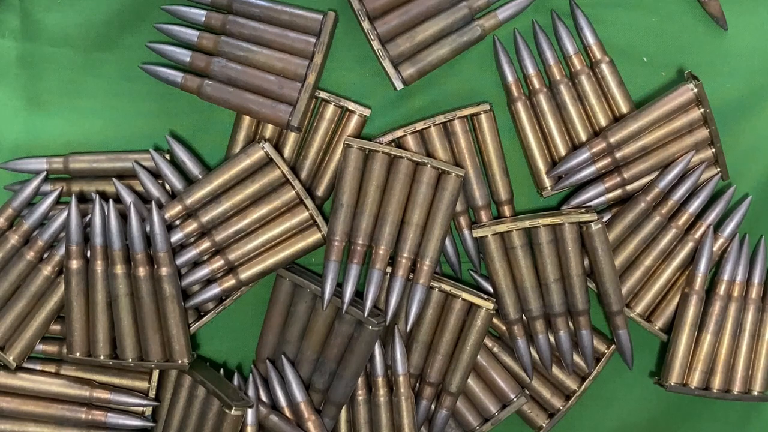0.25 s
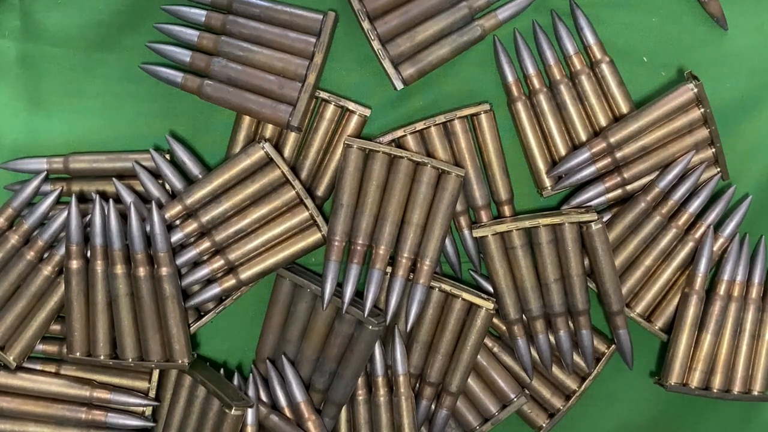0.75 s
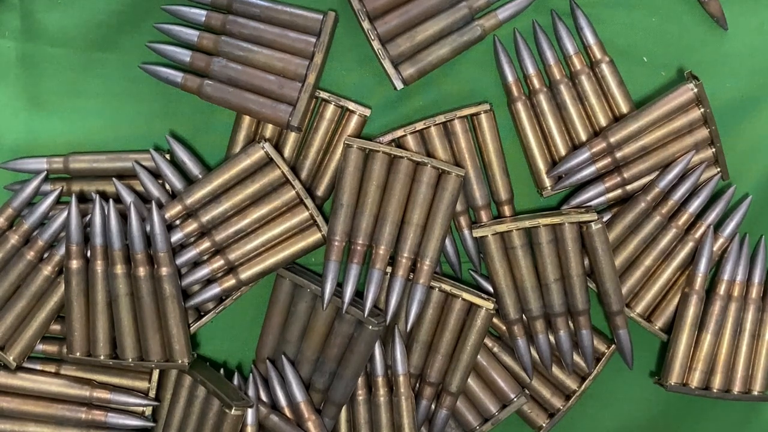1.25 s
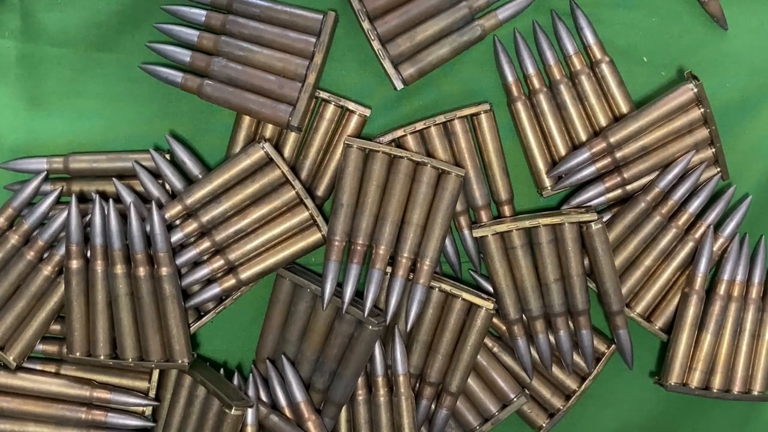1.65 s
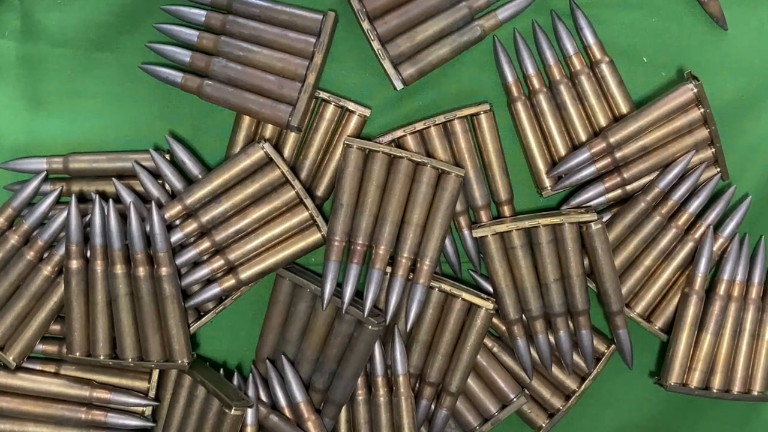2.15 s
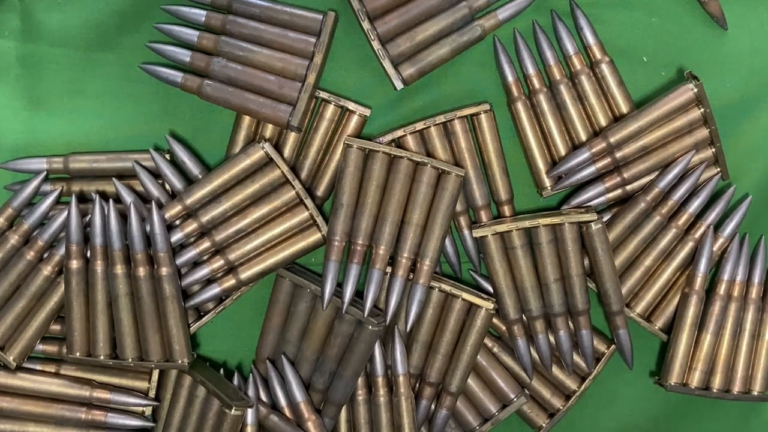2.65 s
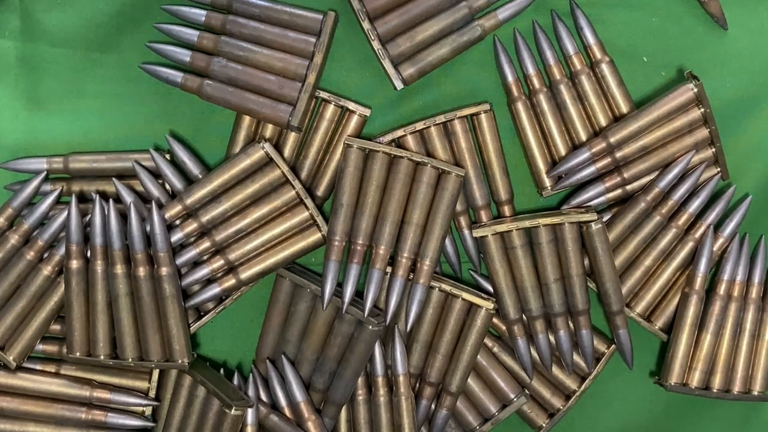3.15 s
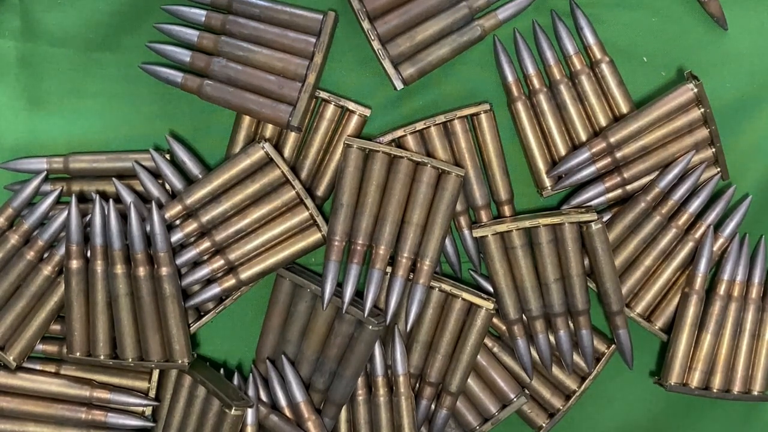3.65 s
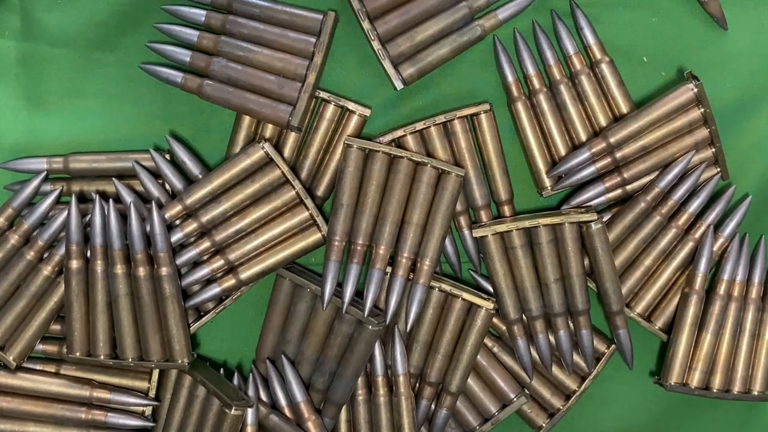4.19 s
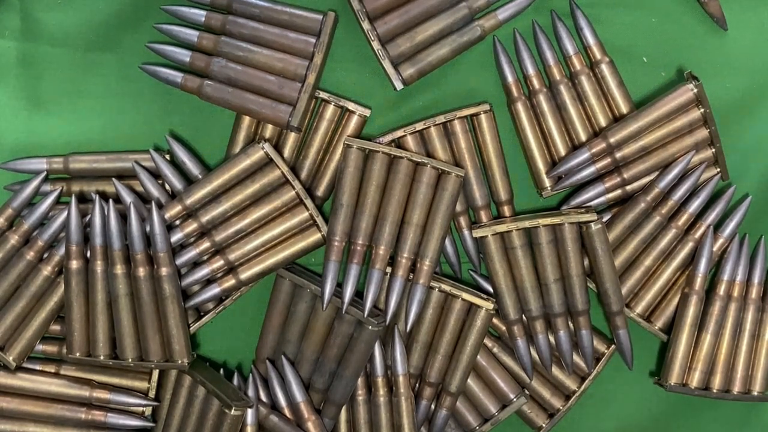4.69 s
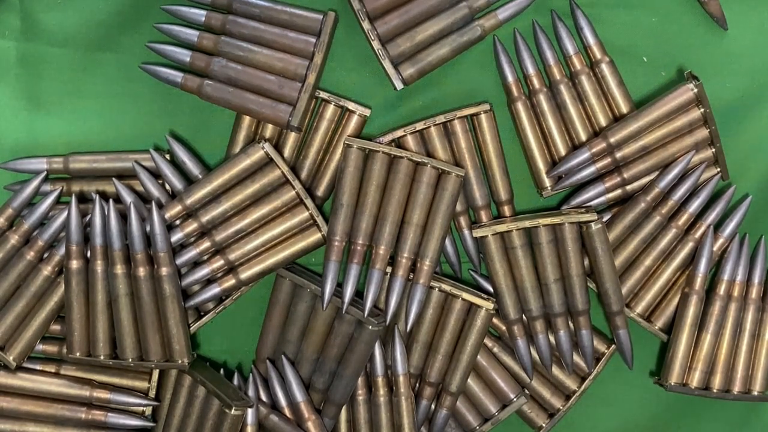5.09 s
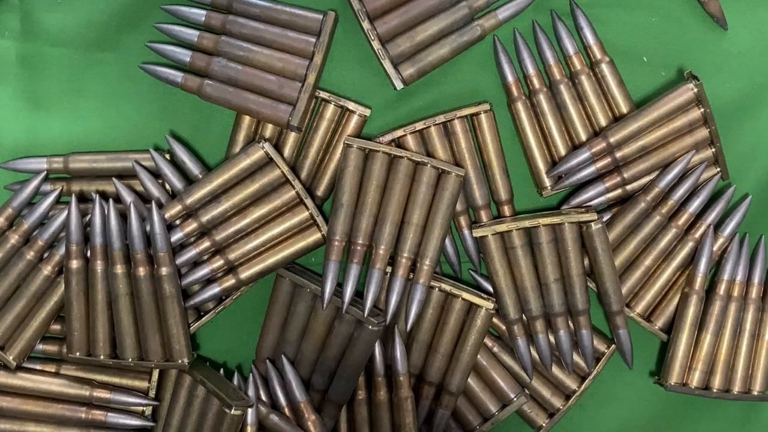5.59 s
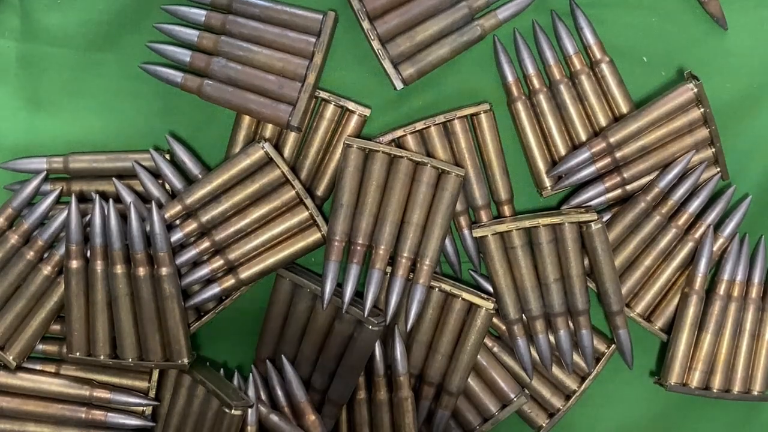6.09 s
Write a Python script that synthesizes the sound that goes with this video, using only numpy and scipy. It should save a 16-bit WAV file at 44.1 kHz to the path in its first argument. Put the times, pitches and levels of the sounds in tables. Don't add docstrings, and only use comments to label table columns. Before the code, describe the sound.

Close to a phone microphone in a small room, fingers rustle over cloth while clipped brass cartridges touch. Faint ticks and light clinks come first, then brighter clicks and ringing clinks after three seconds, the loudest sharp clack at four and a half, a dull strip set-down just after five, and a few last ticks near six. A low, beating motor hum and soft airflow continue underneath.

```python
import sys
import numpy as np
from scipy import signal
from scipy.fft import rfft, irfft, next_fast_len
from scipy.io import wavfile
from scipy.ndimage import uniform_filter1d, map_coordinates

SR = 44100
rng = np.random.default_rng(int(sys.argv[2]) if len(sys.argv) > 2 else 0)


def store_pcm(level_fs):
    pcm = np.round(np.clip(level_fs, -1, 1) * 32767).astype(np.int16)
    wavfile.write(sys.argv[1], SR, np.atleast_2d(pcm).T)


def nominal_scale(level):
    x = np.asarray(level, float) / 20
    return 10 ** x


N = 279138
T = np.arange(N) / SR
SIDES = np.array([[1], [-1]])

# (level [dB], phase [rad])
MOTORS = [
    (-50, 0.1),
    (-56.5, 2.98),
]
MOTOR_HZ = 59.15, 60.51
# (time [s], first motor load [dB], second motor load [dB])
MOTOR_LOAD = [
    (0, -1, -1),
    (3.501, 0.5, 0),
    (3.851, -5.5, -13),
    (4.1, -0.5, -18.5),
    (4.9, 0.5, -13.5),
    (5.351, 3.5, -11),
    (5.77, -5, -20),
    (6.05, 3, -9.5),
    (6.33, -4.5, -0.5),
]
# (frequency [Hz], width [Hz], level [dB])
WHINE = [(191, 9, -57.5), (822, 16, -78.5), (3700, 240, -94.5)]
# (frequency [Hz], level [dB per Hz])
AIR_COLOUR = [(25, -43), (70, -8.5), (120, -12.5), (185, -10.5), (235, -3), (290, -18.5), (430, -15.5),
              (530, -22), (700, -23.5), (1100, -31), (2200, -49.5), (4500, -62.5), (9000, -50.5),
              (16000, -72.5)]
AIR_DB = -53.5
# (frequency [Hz], likeness [0 to 1])
AIR_ALIKE = [(60, 0.8), (250, 0.92), (600, 0.057), (1500, 0.043), (5000, 0.26)]
# (time [s], length [s], level [dB])
GUSTS = [(0.11, 0.095, -61), (0.547, 0.3, -66.5), (0.978, 0.23, -61.5), (1.408, 0.77, -75),
         (1.901, 0.045, -60), (2.127, 0.088, -62.5), (2.358, 0.08, -59.5), (2.79, 0.16, -74),
         (3.294, 0.068, -54), (4.389, 0.066, -59.5), (5.155, 0.1, -67), (5.359, 0.036, -59),
         (6.018, 0.15, -64.5), (6.146, 0.089, -66), (6.33, 0.031, -61)]
WHISTLE_DB = -72
# (time [s], level [dB])
DRAUGHT = [
    (0, -76),
    (.5, -82.5),
    (1.0, -71.5),
    (1.4, -76.5),
    (1.9, -76),
    (3.2, -70.5),
    (4.35, -65),
    (5.0, -72.5),
    (5.8, -78.5),
    (6.33, -71.5),
]

# (time [s], rustle level [dB])
RUSTLE = [(0.0, -80.5), (0.45, -83.5), (1.04, -77.5), (1.34, -88), (1.9, -77), (2.73, -85), (3.3, -76),
          (3.52, -68.5), (3.9, -76.5), (4.55, -76.5), (4.68, -58.5), (4.95, -74.5), (5.22, -61),
          (5.36, -85.5), (5.75, -82.5), (5.97, -58), (6.24, -77.5), (6.33, -67.5)]
SKIN_DB, SKIN_SLOPE = -85.5, 0.98
# (time [s], length [s], level [dB], colour [Hz])
SLIDES = [(0.031, 0.071, -68.5, 9200), (0.2, 0.11, -80, 14000), (1.881, 0.072, -66.5, 12000),
          (2.009, 0.084, -67, 9800), (2.213, 0.05, -69.5, 10800), (2.305, 0.018, -66.5, 11500),
          (2.414, 0.049, -77, 11000), (2.624, 0.069, -66, 8900), (3.293, 0.021, -70, 9130),
          (3.911, 0.058, -64, 11150), (4.329, 0.036, -65, 10000), (4.384, .04, -66.5, 9930),
          (4.525, 0.028, -49, 8960), (5.445, 0.062, -68, 12900), (5.512, 0.044, -73.5, 13000),
          (5.665, 0.028, -55, 9020), (5.828, 0.18, -67, 14000), (5.942, 0.062, -61, 12100),
          (6.271, 0.26, -69, 10900)]

# (time [s], level [dB], colour [Hz], left minus right [dB])
THUMPS = [(0.4882, -57, 4050, 15), (1.023, -51, 2270, 5), (1.094, -48, 2180, 4), (1.719, -46.5, 4100, 6.5),
          (3.028, -37, 3800, 1.5), (3.411, -47, 3300, 2), (3.9278, -41.5, 3300, 1.5),
          (3.948, -44.5, 2800, 3.5), (4.214, -48, 2850, 1), (4.327, -47.5, 2160, 2),
          (4.5283, -32, 4500, -1.5), (4.5485, -25.5, 2900, 0), (4.5494, -37, 1300, 7),
          (4.5486, -36, 2080, -1), (0.734, -57, 1460, 6), (1.0928, -54.5, 1030, 4.5),
          (3.031, -48.5, 897, 4), (5.115, -48.5, 2700, -2), (4.580, -32.5, 2763, 0.5),
          (5.1115, -33, 850, 6.5), (5.112, -28.5, 2500, -5), (5.179, -47, 754, 1.5), (5.235, -36, 1100, 0),
          (5.963, -41, 1950, 0.5)]
THUMP_T60_S = 0.006
# (time [s], level [dB], t60 [s])
SET_DOWN = [
    (5.1119, -31.5, 0.11),
    (5.167, -41, 0.12),
    (5.235, -40.5, 0.21),
    (5.403, -64, 0.19),
]
# (frequency [Hz], width [Hz], level [dB])
BOARD_MODES = [(195, 40, -0.5), (290, 110, 4.5), (501, 340, -3.5), (843, 120, 0.5), (1285, 172, -3),
               (1840, 310, -4.5), (2260, 270, -7), (2754, 180, -14.5), (3700, 120, -5), (4500, 380, -30)]
# (time [s], frequency [Hz], level [dB], t60 [s])
KNOCKS = [(0.4865, 1460, -38, 0.012), (1.0235, 1670, -48, 0.018), (1.0235, 2270, -49, .02),
          (1.0235, 3370, -46, 0.018), (1.0255, 4920, -37, .035), (1.0315, 4800, -39, .035),
          (1.079, 2280, -45, .02), (1.0935, 2170, -45, 0.043), (1.0935, 1600, -44.5, 0.024),
          (1.1015, 2370, -49, .04), (1.7005, 2200, -49, 0.018), (1.72, 1390, -28.5, 0.0089),
          (1.72, 4930, -39, 0.032), (3.031, 890, -56, .015), (3.9278, 2270, -34, 0.014),
          (3.929, 1300, -42, 0.014), (3.948, 2200, -31, 0.0085), (5.117, 818, -43, 0.038),
          (5.165, 836, -41, .06), (5.237, 625, -39.5, .04), (4.58, 2700, -43, .04),
          (3.4125, 4970, -35, .04), (3.416, 2350, -39.5, 0.017), (4.5485, 1486, -33, 0.036),
          (4.5485, 2680, -23.5, 0.027), (4.5485, 3570, -15.5, .02), (4.5835, 4920, -20, 0.032),
          (4.58, 5340, -23, 0.022), (5.1125, 757, -34.5, 0.063), (5.1125, 1303, -42, 0.082),
          (5.1125, 2280, -32.5, 0.038), (5.114, 279, -24.5, 0.045), (5.128, 252, -39, 0.11),
          (5.176, 195, -32.5, 0.052), (5.176, 835, -46, .05), (5.235, 956, -33.5, .03),
          (5.235, 1510, -37.5, 0.043), (5.238, 330, -35, .05), (5.236, 216, -36.5, 0.18)]
# (time [s], frequency [Hz], level [dB], t60 [s])
TINKS = [(0.7343, 8700, -43, .008), (0.7358, 8800, -32, 0.008), (0.7955, 8940, -41, .01),
         (0.7966, 8830, -30, 0.005), (2.049, 8320, -40.5, 0.015), (3.0299, 9500, -27.5, .006),
         (3.0318, 10330, -22.5, .008), (3.035, 8450, -42.5, 0.0078), (3.4125, 5570, -32, 0.054),
         (3.4388, 9400, -19, .007), (3.4425, 11360, -29.5, .01), (3.928, 11450, -23.5, 0.01),
         (3.9283, 8560, -28.5, .008), (3.948, 8400, -37, .01), (4.5492, 9530, -19, 0.0054),
         (4.5605, 8500, -29, .015), (4.5825, 11500, -20.5, .02), (4.5845, 11550, -23.5, 0.0087),
         (4.5808, 8820, -21, .012), (5.972, 11210, -21, 0.014), (6.302, 5240, -24.5, 0.012),
         (6.3065, 4800, -46, .02)]
KNOCK_PUSH_CYCLES, KNOCK_ROOM_DB = 0.9, -5

# (time [s], chatter level [dB], struck part [Hz], 4.5 kHz against 8 kHz [dB], 13 kHz against 8 kHz [dB])
TICKS = [(0.486, -36.5, 6340, 1, -4.5), (0.7345, -35.5, 9250, -6.5, 0.5), (0.7948, -46.5, 8640, -11, -2),
         (2.446, -59, 5730, 8, -18), (2.6076, -34.5, 10000, -10, -15), (3.0304, -21, 9200, -3.5, -4),
         (3.4388, -16, 9850, -4, -1.5), (4.5471, -6, 9400, 1.5, 4), (4.5491, -13, 9100, -10, -1),
         (4.552, -35, 9000, -6, 0), (4.5768, -17, 9300, -15, -5), (3.948, -40, 8300, -10, -10),
         (1.7203, -46, 6600, -4, -6), (4.333, -45.5, 9050, 5, 5), (5.8704, -37.5, 3870, 23.5, 10),
         (5.9638, -20, 3970, 1, -2.5), (5.9718, -22.5, 10500, 8.5, 8), (6.0756, -41, 4600, 6.5, -12.5),
         (6.3014, -30, 4500, 10, -1)]
# (time [s], chatter level [dB], struck part [Hz], 4.5 kHz against 8 kHz [dB], 13 kHz against 8 kHz [dB])
CLINKS = [(0.0474, -50.5, 9200, 11, -1), (1.0235, -32.5, 9600, 4.5, -2), (1.0797, -45, 4850, -5, -7),
          (1.093, -36, 10400, -14, -18), (1.6999, -44.5, 9700, -1, -4), (1.9028, -49, 6150, -4, -10),
          (2.0405, -47, 6740, 5, 1), (2.0494, -38, 5450, 5, -1), (2.6397, -53, 6740, 7, -29),
          (3.3372, -26, 5050, 0, 2.5), (3.4114, -16.5, 12070, -4, -1), (3.6438, -51, 7040, -4, -27),
          (3.9277, -28.5, 11760, 4.5, 4.5), (3.9498, -37.5, 4800, 3, -19),
          (4.2148, -39.5, 3960, 3.5, -16.5), (4.327, -45.5, 9070, -10.5, -7.5),
          (4.5795, -14.5, 8920, -3.5, -7.5), (4.5838, -25, 8660, 4.5, -10.5), (4.7844, -40.5, 4970, 6, -2),
          (4.7964, -36, 4850, 15.5, 11.5), (4.8611, -46, 4400, 8, -2), (4.9686, -33, 11440, 1.5, -8.5),
          (5.0144, -32.5, 8450, 4, -18.5), (5.1145, -30, 8900, 1.5, -10), (6.305, -54, 4740, 18, -12)]
# (time [s], chatter level [dB], struck part [Hz], 4.5 kHz against 8 kHz [dB], 13 kHz against 8 kHz [dB])
RATTLES = [(0.4786, -54, 3900, 3, 0), (1.0311, -53, 4770, 8, -12), (1.1002, -39, 9700, 14.5, 13),
           (1.6905, -54, 12300, 6, -12), (1.7185, -35, 6500, 0.5, -8), (3.3316, -40, 4840, 15, -16),
           (3.3536, -37, 5000, 2, 3), (3.9097, -50.5, 11000, 18.5, 9), (4.3713, -52, 2800, 14.5, -3),
           (4.3856, -54.5, 10700, -14, -11), (4.509, -53, 12100, 15, -3), (4.56, -30, 8400, -5, -13),
           (4.8209, -47.5, 11800, -11, -3), (5.1818, -48, 4000, 21, -7), (5.2354, -37.5, 3630, 20, -14),
           (5.6569, -48, 4820, 18, -10.5), (5.6637, -44, 3710, 29.5, -1), (5.8622, -57, 4330, 3, -4),
           (5.932, -60, 3530, 11.5, -1.5)]
# (time [s], chatter level [dB], struck part [Hz], 4.5 kHz against 8 kHz [dB], 13 kHz against 8 kHz [dB])
DRAGS = [
    (4.5262, -24.5, 8980, -16.5, -4),
    (5.1112, -38, 3030, 29.5, -18.5),
]
TICK_MS, CLINK_MS, RATTLE_MS, DRAG_MS = 1.3, 2.8, 6, 10
FIRST_TICK_DB, FIRST_TICK_T60_S, TOUCH_S = 9.5, 0.0092, 0.001
# (time [s], frequency [Hz], level [dB], t60 [s])
STRIP_RINGS = [(1.017, 4900, -61, .3), (1.026, 4880, -47, .32), (1.079, 4900, -59, .3),
               (1.722, 4950, -63, .25), (2.052, 5200, -61, .24), (3.3372, 4840, -39, .44),
               (3.353, 4960, -47, .3), (3.412, 4940, -40.5, .44), (3.93, 5150, -54, .4),
               (4.58, 4800, -43, .28), (4.784, 5040, -54, .2), (4.797, 4970, -54, .22),
               (4.968, 4900, -55, .23), (5.015, 4900, -55, .25), (5.964, 4900, -45, .3),
               (6.076, 4800, -62, .2), (6.302, 4930, -45, .21)]
# (time [s], frequency [Hz], level [dB])
CASE_RINGS = [
    (1.093, 11700, -70),
    (3.338, 11580, -51),
    (3.414, 11480, -44),
    (3.929, 11480, -63),
    (4.548, 11300, -42),
    (4.581, 11400, -45),
    (4.797, 11700, -66),
    (5.972, 11300, -58),
]
# (time [s], frequency [Hz], level [dB])
ODD_RINGS = [
    (1.724, 6700, -57),
    (3.032, 4050, -58),
    (3.032, 6230, -55),
    (5.113, 3640, -54),
    (5.255, 3640, -58),
    (4.55, 2700, -47),
    (3.339, 5650, -54),
]
CASE_T60_S, ODD_T60_S = 0.22, 0.22
# (time [s], frequency [Hz], level [dB])
PINGS = [(1.0945, 10600, -37), (3.338, 11600, -34), (3.4116, 11500, -18), (3.4130, 11450, -16),
         (3.4388, 11800, -27), (3.9278, 11500, -34), (4.5472, 11400, -21), (4.5770, 11500, -23),
         (4.5795, 11500, -18), (4.5838, 11450, -20), (4.5805, 4900, -27), (4.7975, 5000, -37),
         (4.9686, 11400, -37), (5.0144, 11600, -40), (5.9638, 11200, -27), (5.9718, 11400, -20)]
PING_T60_S = 0.014
# (frequency ratio, level [dB], share of t60)
CLUSTER = [(.955, -8, .75), (.98, -3, .95), (.998, -1.5, 1), (1.014, -2, .9), (1.034, -3, .95),
           (1.058, -6, .8), (1.09, -11, .6)]
RING_DB, RING_TURN_RAD, RING_RISE_S = -1, 2, 0.001

# (time [s], left port late [ms], left minus right [dB])
HANDS = [
    (0, 0.092, -4),
    (3.2, 0.11, -3),
    (3.349, 0.13, -4),
    (5.2, 0.09, -2.5),
    (5.9, 0.21, -7.5),
    (6.33, 0.18, -1),
]
# (frequency [Hz], t60 [s])
ROOM = [(500, 0.94), (1500, 0.48), (3000, 0.44), (6000, 0.3), (10000, 0.066), (15000, 0.018)]
ROOM_DB, EARLY_DB = -8.5, -8.5
# (frequency [Hz], left minus right [dB])
PORTS = [(60, 3.5), (110, 7.5), (200, 1), (380, -0.5), (700, -1), (2400, 1.4), (4400, 3), (6500, 7.5)]
# (frequency [Hz], level [dB])
TREBLE_COLOUR = [(5600, 0), (6650, 4), (8000, -2.5), (9900, -5), (11500, 1), (13200, -4), (14800, -1)]
SPREAD_LAG_S, SPREAD_RAD, SPREAD_HZ = 3.02e-4, 3.45, 6650
BASS_TURN_RAD = 0.89


def along(table, hz):
    table_hz, value = np.array(table).T
    return np.interp(np.log(hz + 1), np.log(table_hz), value)


def shape(x, gain):
    size = next_fast_len(x.shape[-1], True)
    spectrum = rfft(x, size) * gain(np.fft.rfftfreq(size, 1 / SR))
    return irfft(spectrum, size)[..., :x.shape[-1]]


def hill(hz, centre_hz, width_hz):
    return 1 / np.sqrt(1 + (2 * (hz - centre_hz) / width_hz) ** 2)


def fade(t, t60):
    return np.exp(-np.log(1000) * np.maximum(t, 0) / t60) * (t >= 0)


def unit(x):
    return x / np.sqrt(np.mean(x ** 2))


def noise():
    return rng.standard_normal(N)


def walk(rate):
    hold = int(SR / rate)
    steps = np.repeat(rng.standard_normal(N // hold + 1), hold)
    return 1.64 * uniform_filter1d(uniform_filter1d(steps, hold), hold)[:N]


def add(track, s, sound):
    i = int(s * SR)
    track[..., i:i + sound.shape[-1]] += sound[..., :N - i]


def even(x, count):
    broad = uniform_filter1d(np.abs(rfft(x)) ** 2, size=len(x) // count)
    return irfft(rfft(x) / np.sqrt(broad), len(x))


def causal(gain):
    def late(f):
        fold = irfft(np.log(gain(f) + 1e-4))
        fold[1:len(f) - 1] *= 2
        fold[len(f):] = 0
        return np.exp(rfft(fold))
    return late


def burst(chance, t60, gain, spike_db):
    t = T[:chance.shape[1]] - 0.005
    first = nominal_scale(FIRST_TICK_DB) * min(0.02 / t60, 1) ** 2 * fade(t, min(FIRST_TICK_T60_S, 1.4 * t60))
    first = first * np.clip(t / min(TOUCH_S, 0.15 * t60), 0, 1)
    chatter = fade(t, t60) * np.clip(t / (0.072 * t60), 0, 1)
    grain = chance[0] * nominal_scale(spike_db * chance[1])
    contacts = even(grain * (chatter + first), count=32) * (t >= 0)
    x = shape(contacts, causal(gain))
    return x / np.sqrt(uniform_filter1d(x ** 2, size=40).max())


def machines():
    s, *loads_db = np.transpose(MOTOR_LOAD)
    hum = 0
    for hz, (db, rad), load_db in zip(MOTOR_HZ, MOTORS, loads_db):
        load = nominal_scale(np.interp(T, s, load_db))
        hum = hum + np.sqrt(2) * load * nominal_scale(db) * np.sin(2 * np.pi * hz * T + rad)
    whine = sum(nominal_scale(db) * unit(shape(noise(), lambda f: hill(f, hz, width_hz) ** 2)) for hz, width_hz, db in WHINE)
    alike = lambda f: np.clip(along(AIR_ALIKE, f), 0, 1)
    mid = shape(noise(), lambda f: nominal_scale(along(AIR_COLOUR, f)) * np.sqrt(1 + alike(f)))
    side = shape(noise(), lambda f: nominal_scale(along(AIR_COLOUR, f)) * np.sqrt(1 - alike(f)))
    air = (mid + SIDES * side) * nominal_scale(AIR_DB + 1.6 * walk(5.003)) / np.sqrt(np.mean(mid ** 2))
    rumble = nominal_scale(-73.0) * unit(shape(noise(), lambda f: hill(f, 55, 32) ** 3 * (f > 25)))
    return hum + whine + rumble + air


def duct():
    gusts = nominal_scale(WHISTLE_DB)
    for s, length, db in GUSTS:
        gusts = gusts + nominal_scale(db) * np.exp(-(2 * (T - s) / length) ** 2)
    whistle = unit(shape(noise(), lambda f: hill(f, 609, 22) ** 2))
    draught = unit(shape(rng.standard_normal((2, N)), lambda f: hill(f, 1386, 900) ** 2))
    return whistle * gusts + draught * nominal_scale(np.interp(T, *np.transpose(DRAUGHT)))


def fingers():
    busy_db = np.interp(T, *np.transpose(RUSTLE))
    grain = lambda: noise() * nominal_scale(1.8 * walk(450))
    skin = unit(shape(grain(), lambda f: hill(f, 10500, 7000) ** 2 * (f > 5000)))
    cloth = unit(shape(grain(), lambda f: hill(f, 4000, 5600) ** 2))
    return skin * nominal_scale(SKIN_DB + SKIN_SLOPE * (busy_db + 78.0)) + cloth * nominal_scale(busy_db)


def slides():
    out = np.zeros(N)
    peak_s = 0.18
    for s, length, db, hz in SLIDES:
        chance = rng.standard_normal((2, 16384))
        swell = np.exp(-(2 * (T[:16384] - peak_s) / length) ** 2)
        hiss = unit(shape(chance[0] * nominal_scale(4.0 * chance[1]), lambda f: hill(f, hz, hz) ** 2))
        skip = int(max(peak_s - s, 0) * SR)
        add(out, max(s - peak_s, 0), (nominal_scale(db) * swell * hiss)[skip:])
    return out


def table():
    out = np.zeros((2, N))
    for s, db, hz, pan_db in THUMPS:
        chance = rng.standard_normal((2, 4096))
        body = lambda f: hill(f, hz, 0.3 * hz) ** 2 + nominal_scale(-14) * hill(f, 2000, 1800) ** 2
        colour = lambda f: body(f) * f ** 2 / (f ** 2 + 800 ** 2)
        thump = burst(chance, THUMP_T60_S, colour, spike_db=3.5)
        add(out, s - 0.005, nominal_scale(db + 2.0 + SIDES * pan_db / 2) * thump)
    board = lambda f: sum(nominal_scale(db) * hill(f, hz, width_hz) ** 2 for hz, width_hz, db in BOARD_MODES)
    for s, db, t60 in SET_DOWN:
        add(out, s - 0.005, nominal_scale(db) * burst(rng.standard_normal((2, 16384)), t60, board, spike_db=6.5))
    return out


def knocks():
    out, t = np.zeros((2, N)), T[:SR // 4]
    for s, hz, db, t60 in list(KNOCKS) + list(TINKS):
        push = np.sin(np.pi / 2 * np.clip(t * hz / KNOCK_PUSH_CYCLES, 0, 1))
        add(out, s, nominal_scale(db) * push * fade(t, t60) * np.sin(2 * np.pi * hz * t))
    return out


def ring(hz, t60):
    ratio, db, share = np.transpose(CLUSTER)[:, :, None]
    detune, uneven, path = rng.standard_normal((3, len(CLUSTER), 1))
    t = T[:int(min(0.45, 1.3 * t60) * SR)]
    turn = RING_TURN_RAD * path * SIDES[:, :, None] / 2
    tone = np.sin(2 * np.pi * hz * ratio * (1 + 0.0012 * detune) * t + turn)
    modes = nominal_scale(db + 2 * uneven) * fade(t, t60 * share) * tone
    return np.sum(modes, axis=1) * np.clip(t / RING_RISE_S, 0, 1)


def cartridges():
    out, rings = np.zeros((2, 2, N))
    for contacts, ms in (TICKS, TICK_MS), (CLINKS, CLINK_MS), (RATTLES, RATTLE_MS), (DRAGS, DRAG_MS):
        for s, db, hz, low_db, high_db in contacts:
            contact = [(900, low_db - 35.5), (2200, low_db - 18), (4500, low_db), (8000, 0.0058),
                       (13000, high_db), (17000, high_db - 17)]
            struck = lambda f: 1 + nominal_scale(7) * hill(f, hz, 0.07 * hz) ** 2
            colour = lambda f: nominal_scale(along(contact, f)) * struck(f)
            chatter = burst(rng.standard_normal((2, 2048)), 0.0038 * ms, colour, spike_db=7.0)
            add(out, s - 0.005, nominal_scale(db - 0.5) * chatter)
    for s, hz, db in PINGS:
        add(out, s, nominal_scale(db - 4.5) * ring(hz, PING_T60_S))
    free = list(STRIP_RINGS)
    free += [(*row, CASE_T60_S) for row in CASE_RINGS]
    free += [(*row, ODD_T60_S) for row in ODD_RINGS]
    for s, hz, db, t60 in free:
        add(rings, s, nominal_scale(db + RING_DB) * ring(hz, t60))
    return out + rings * nominal_scale(3 * walk(220))


def placed(near):
    s, late_ms, pan_db = np.transpose(HANDS)
    heard_s = T - np.interp(T, s, late_ms) / 1000
    left = map_coordinates(near[0], [heard_s * SR], order=5, mode="nearest")
    return np.array([left * nominal_scale(np.interp(T, s, pan_db)), near[1]])


def room(x):
    t, out = T[:int(0.6 * SR)], []
    for port in x:
        tail = 0
        for hz, t60 in ROOM:
            band = shape(rng.standard_normal(len(t)), lambda f: hill(f, hz, 1.9 * hz) ** 2)
            tail = tail + fade(t, t60) * band
        tail = tail * np.clip((t - 0.003) / 0.0035, 0, 1)
        early = even(rng.standard_normal(len(t)) * fade(t - 0.001, 0.031), count=100)
        answer = nominal_scale(ROOM_DB) * tail / np.sqrt(np.sum(tail ** 2))
        answer = answer + nominal_scale(EARLY_DB) * early / np.sqrt(np.sum(early ** 2))
        out.append(signal.fftconvolve(port, answer)[:N])
    return np.array(out)


def scene():
    near = placed(cartridges() + fingers() + slides() + table())
    wood = placed(knocks())
    return near + wood + room(near + nominal_scale(KNOCK_ROOM_DB) * wood) + machines() + duct()


def band_limit(x):
    return signal.sosfilt(signal.butter(12, 16980, fs=SR, output="sos"), x)


def record(dry):
    low = lambda f: 1 / (1 + (f / SPREAD_HZ) ** 10)
    bass_turn = lambda f: np.exp(0.5j * SIDES * BASS_TURN_RAD * hill(f, 0, 160) ** 2)
    bass = shape(dry, lambda f: low(f) * nominal_scale(SIDES * along(PORTS, f) / 2) * bass_turn(f))
    spread = lambda f: np.exp(0.5j * SIDES * (2 * np.pi * f * SPREAD_LAG_S + SPREAD_RAD))
    top = lambda f: nominal_scale(np.interp(f, [15500, 16000, 16800, 16950], [0, -15, -18, -70]))
    treble = shape(dry[[1, 1]], lambda f: (1 - low(f)) * spread(f) * top(f) * nominal_scale(along(TREBLE_COLOUR, f)))
    rounded = 0.9 * np.tanh((bass + treble) / 0.9)
    return band_limit(rounded)


dry = scene()
out = record(dry)
store_pcm(out)
```